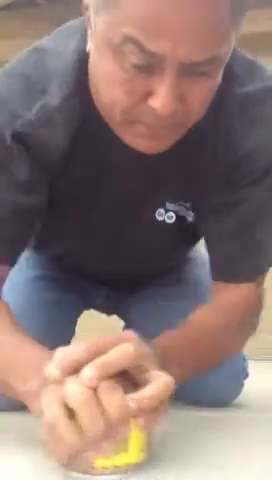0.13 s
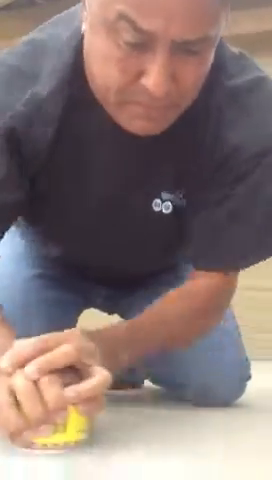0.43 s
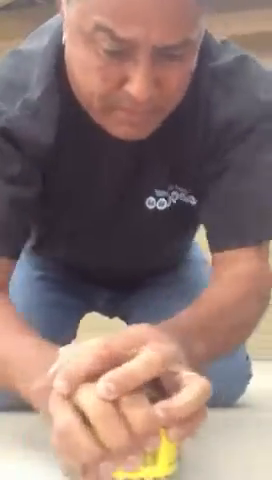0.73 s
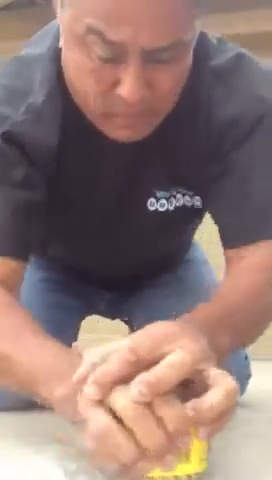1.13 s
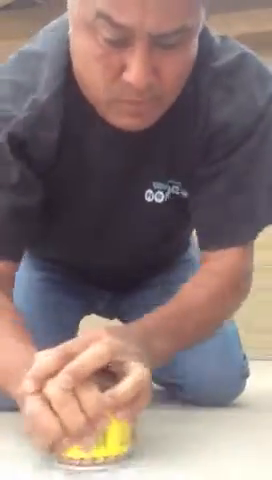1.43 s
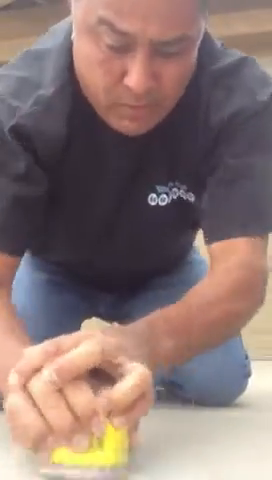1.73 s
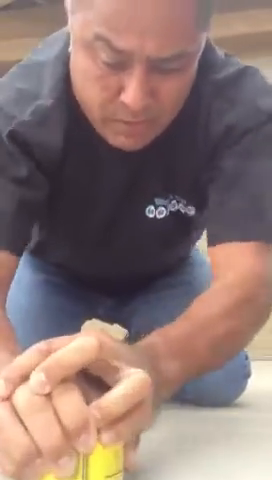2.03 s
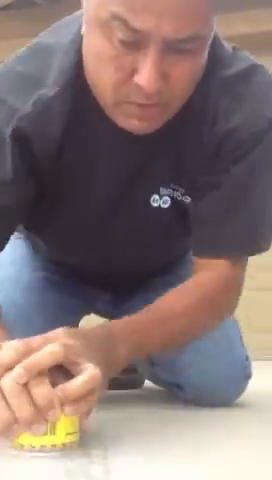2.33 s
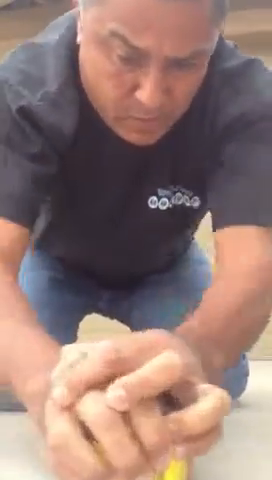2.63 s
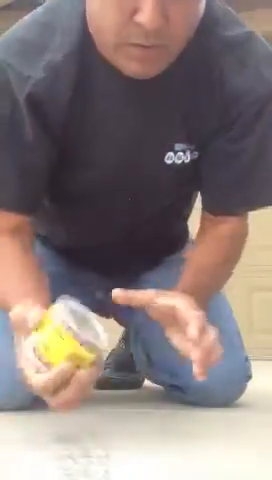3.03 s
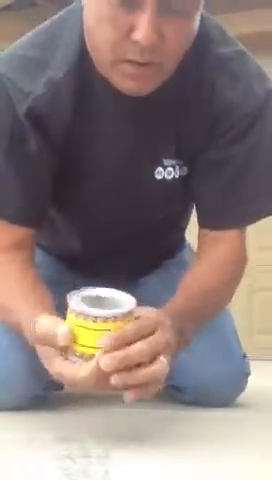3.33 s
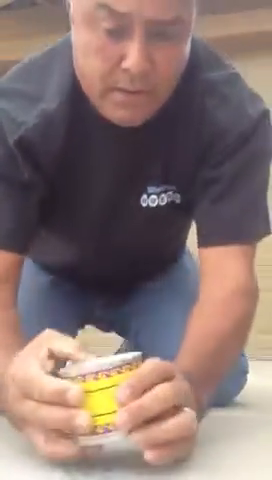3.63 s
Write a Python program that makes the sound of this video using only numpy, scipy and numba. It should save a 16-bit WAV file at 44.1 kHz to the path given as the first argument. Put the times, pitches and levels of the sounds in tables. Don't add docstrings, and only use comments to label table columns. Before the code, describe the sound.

A small metal can is scraped on rough concrete in about four short strokes a second, gritty and hollow, with a rattling skip midway, then near quiet; close phone microphone outdoors.

```python
import sys
import numpy as np
from scipy import signal
from scipy.fft import rfft, irfft
from scipy.io import wavfile
from scipy.ndimage import uniform_filter1d
from numba import njit

SR = 44100
rng = np.random.default_rng(int(sys.argv[2]) if len(sys.argv) > 2 else 0)


def ratio_of_db(decibels):
    return 10 ** (np.asarray(decibels, float) / 20)


def output_pcm(signal):
    pcm = np.clip(np.atleast_2d(signal).T, -1, 1) * 32767
    wavfile.write(sys.argv[1], SR, np.round(pcm).astype(np.int16))


N = 167580

# start in seconds, length in seconds, grit level in dB,
# place of top speed (0-1), ring level in dB.
STROKES = [(-.14, 0.19, -28.5, 0.17, 7.5), (0.062, 0.23, -23.5, 0.65, -9), (0.318, 0.22, -35, 0.41, 2),
           (0.536, 0.2, -26.5, 0.58, 0.5), (0.749, 0.22, -33.5, 0.53, 1), (0.976, 0.19, -27.5, 0.57, 1.5),
           (1.213, 0.21, -41.5, 0.39, 6), (1.442, .228, -33, 0.5, 1.5), (1.831, 0.069, -33.5, 0.8, 4),
           (1.919, .24, -34.5, 0.6, -0.5), (2.22, 0.27, -30, 0.05, 3), (2.462, 0.25, -30, 0.66, 2.5),
           (2.724, 0.27, -36.5, 0.51, 4)]
JUDDER_PER_S = 90
PITCH_WANDER = 0.016


def level(x, db):
    return x * ratio_of_db(db) / np.sqrt(np.mean(x ** 2))


@njit
def svf(x, hz, width_hz):
    y, band, low = np.empty(len(x)), 0., 0.
    for i in range(len(x)):
        g, damping = np.tan(np.pi * hz[i] / SR), width_hz / hz[i]
        v = (band + g * (x[i] - low)) / (1 + g * (g + damping))
        low += 2 * g * v
        band = 2 * v - band
        y[i] = damping * v
    return y


def ring(x, hz, width_hz):
    return svf(x + 1e-18, hz + np.zeros(N), 1. * width_hz) * np.sqrt(SR / np.pi / width_hz)


def mode(x, hz, width_hz):
    return ring(ring(x, hz, width_hz), hz, width_hz) * np.sqrt(2 * np.pi * width_hz / SR)


def colour(x, table):
    hz, db = np.array(table, float).T
    bin_hz = np.arange(N // 2 + 1) * SR / N
    return irfft(rfft(x) * ratio_of_db(np.interp(np.log(bin_hz + 1), np.log(hz), db)), N)


def walk(rate_per_s):
    hold = int(SR / rate_per_s)
    steps = np.repeat(rng.standard_normal(N // hold + 1), hold)
    return 1.55 * uniform_filter1d(uniform_filter1d(steps, hold), hold)[:N]


def bell(t, at, half_s):
    return np.exp(-((t - at) / half_s) ** 2)


def grit():
    grains_per_s, spread_db, cap_db = 16000, 2.5, 9
    chance, sign, size = rng.random((3, N))
    size_db = np.minimum(-spread_db * np.log(1 - size), cap_db)
    return level((chance < grains_per_s / SR) * np.sign(sign - .5) * ratio_of_db(size_db), 0)


def strokes(t):
    # time in seconds, half width in seconds, grit boost in dB, ring boost in dB.
    patches = [(0.11, 0.045, 4, 15.5), (0.18, 0.014, -6.5, 3), (0.22, 0.019, 7, -0.5),
               (0.28, 0.015, 12.5, -4), (0.47, 0.017, 2.5, 4.5), (0.686, 0.01, 3, -3),
               (1.073, 0.05, 1.5, 2), (1.283, .005, 2, 5), (1.538, 0.02, 0.5, -2.5),
               (2.01, 0.012, -1.5, 11), (2.55, 0.0056, -2.5, 3), (3.2, 0.0047, 0.5, 4.5), (3, 0.04, 1, 2.5),
               (3.3, 0.005, 5.5, 4.5), (2.80, 0.0068, 3, -1.5), (1.308, 0.0095, -0.5, 7.5),
               (0.66, 0.0068, 1.5, -2.5), (2.578, 0.0066, -1.5, -1), (1.5, .005, -3, -7.5),
               (0.25, 0.0034, 0, 5), (2.76, 0.0038, 6, 6), (2.5, 0.016, -1.5, 4), (1.945, .01, -8, 13),
               (2.5, 0.019, 1, 7.5), (2.44, 0.022, -0.5, 5)]
    bite_slope, speed_power = 2.8, 0.35
    force, push, turn, along = np.zeros(N), np.zeros(N), np.ones(N), np.zeros(N)
    for start, length, db, top, ring_db in STROKES:
        v = np.clip((t - start) / length, 0, 1)
        skew = np.log(.5) / np.log(np.clip(top, .1, .9))
        speed = np.sin(np.pi * v ** skew).clip(0)
        bite = np.tanh(bite_slope * speed) * speed ** speed_power
        force += ratio_of_db(db + 5.5) * bite
        push += ratio_of_db(db + 2.5 + ring_db) * bite
        turn -= speed
        along += (v - .5) * (v > 0) * (v < 1)
    for at, half_s, db, ring_db in patches:
        swell = bell(t, at, half_s)
        force *= ratio_of_db(db * swell)
        push *= ratio_of_db(ring_db * swell)
    force *= ratio_of_db(1.5 * walk(JUDDER_PER_S))
    push *= ratio_of_db(1.8 * walk(JUDDER_PER_S * 1.5))
    return force, push, turn, along


def hops(t):
    # time in seconds, grit level in dB, skid in seconds, thud level in dB, ring level in dB.
    landings = [(1.3283, -60, 0.0053, -28.5, -11), (1.3519, -24, 0.0015, -37, 6),
                (1.3744, -33, 0.009, -32, 6), (1.716, -30, 0.0056, -46.5, 2.5),
                (1.7231, -21.5, 0.011, -35, 1.5), (1.742, -33, .005, -38, 8), (1.7523, -9, 0.0036, -39, -4),
                (1.766, -36, 0.0042, -42, 9), (1.7799, -6, 0.0046, -36, -12),
                (1.795, -19, 0.0016, -54, 10.5), (1.8066, 0, 0.0058, -34, -17.5),
                (1.815, -32.5, 0.0038, -36, 2), (1.8408, -6.5, 0.0078, -24, -4),
                (1.851, -45, 0.0026, -31, -14), (1.8628, -24.5, 0.0091, -31, -3),
                (2.2103, -25.5, 0.0075, -41, -6), (2.226, -20.5, 0.021, -53, -3),
                (2.2525, -11.5, 0.0032, -38, -19), (2.283, -34.5, 0.01, -38.5, -6),
                (2.3124, -28.5, 0.012, -30.5, 8.5), (2.350, -31, 0.0016, -39, 8.5),
                (0.7779, -48, 0.015, -32.5, 14.5), (0.3355, -39.5, 0.0072, -37, -16),
                (1.2244, -39.5, 0.054, -40.5, -28), (0.0852, -34.5, 0.01, -42, -1),
                (0.541, -40, 0.0051, -47, -2), (1.936, -40, .012, -41, -0.5),
                (2.735, -40.5, 0.0056, -48, -0.5), (0.996, -43, 0.006, -49, 7)]
    airborne_s, airborne_db, landing_s = 0.007, -11, 0.0012
    skid, knock, thud, touch = np.zeros(N), np.zeros(N), np.zeros(N), np.ones(N)
    for at, db, skid_s, thud_db, ring_db in landings:
        attack = np.clip((t - at) / landing_s, 0, 1)
        slide = ratio_of_db(db) * attack * np.exp(-(np.clip(t - at, 0, 1) / skid_s) ** 1.16)
        skid += slide
        knock += ratio_of_db(ring_db + 2) * slide
        touch *= ratio_of_db(airborne_db * (t < at) * bell(t, at - airborne_s / 2, airborne_s))
        thud[int(at * SR)] += ratio_of_db(thud_db) * 12
    return skid, knock, touch, ring(thud, 336, width_hz=130)


def snags():
    # time in seconds, peak level in dB, lid share in dB.
    stones = [(0.112, -13, 3), (0.141, -10, -9), (0.164, -13, -1), (0.194, -19, 3), (0.215, -18, 0),
              (0.392, -19.5, -3), (0.412, -24, -6), (0.587, -22, 10), (0.637, -21, -3), (0.685, -18, 7),
              (0.793, -24, -2), (0.821, -17, 2), (0.854, -29, -6), (0.916, -16, -6), (1.029, -15, -8),
              (1.057, -18, -3), (1.094, -24, -24), (1.264, -22, -1), (1.284, -23, 6), (1.304, -23, 1),
              (1.351, -17.5, -9), (1.375, -21.5, 1), (1.397, -24, -5), (1.539, -25, -3), (2.007, -22, -1),
              (2.228, -12, -3), (2.252, -15.5, -3.5), (2.283, -19.5, -3), (2.312, -14.5, -4),
              (2.35, -16, 8), (2.385, -21.5, -1), (2.523, -31, 0), (2.549, -18, 0), (2.576, -18.5, -11),
              (2.595, -10.5, -12), (2.613, -17.5, -5), (2.666, -19, -5), (2.756, -30, -3),
              (2.797, -24, -0.5), (2.85, -29, -11), (2.875, -23, 4)]
    snag_db = 20.5
    blow, lid_blow = np.zeros(N), np.zeros(N)
    for at, db, lid_db in stones:
        i = int(at * SR)
        blow[i] = ratio_of_db(db + snag_db)
        lid_blow[i] = ratio_of_db(db + snag_db + lid_db)
    return blow, lid_blow


def grip(t):
    # wall in Hz, wall level in dB, lid in Hz, upper lid in Hz, upper lid level in dB.
    tunings = [(479, -10, 1015, 1405, 1.5), (461, -4.5, 1035, 1394, 1.5), (441, -9, 1014, 1384, 6),
               (543, -3, 1050, 1480, 0.5), (409, -8.5, 962, 1383, 2.5), (590, -1.5, 1070, 1450, -2),
               (471, -4.5, 997, 1420, -2), (776, 0, 1050, 1470, -1), (394, -9, 1043, 1290, 4.5),
               (503, -5, 926, 1450, -5), (361.4, -12, 853, 1350, 3), (521, -17.5, 983, 1435, 4),
               (392, -8, 940, 1300, 3)]
    # lid level in dB, wall climb along the stroke (share of Hz), rim in Hz,
    # rim level in dB, middle hiss level in dB.
    tilts = [(-0.5, 0.25, 2910, -12.5, -1), (-1.5, 0.4, 2900, -12, 1), (-1.5, 0.18, 2920, -14, 0),
             (0, .45, 2880, -9.5, -1.5), (-1, 0.31, 2900, -9.5, -2), (1, 0.41, 2850, -13.5, -8.5),
             (-0.5, -0.38, 2520, -13.5, 0.5), (-1.5, .08, 2400, -9.5, 0), (-5, .2, 2790, -25, -1.5),
             (-1, .15, 2970, -16, -0.5), (-5.5, 0.17, 2800, -32, -1.5), (1, 0.28, 2950, -6.5, 1.5),
             (-2, 0.36, 2700, -11.5, -1)]
    early_s = .12 * (np.abs(t - 1.77) < .07)
    which = (np.searchsorted(np.array(STROKES)[:, 0], t + early_s) - 1).clip(0)
    return (*np.array(tunings, float)[which].T, *np.array(tilts, float)[which].T)


def rim_hiss(scrape, shake, middle_db):
    # frequency in Hz, level in dB per Hz.
    slab = [(150, -19), (500, 1.5), (2400, -3), (3800, -22), (6000, -7.5), (9500, -0.5), (13300, 8),
            (14600, -6.5)]
    # frequency in Hz, width in Hz, level in dB.
    shell = [(211, 52, -23), (837, 190, -14), (1400, 670, -7.5), (1940, 330, -19), (2935, 480, -17.5),
             (4465, 1400, -12), (7280, 1900, -15), (10860, 980, -6), (11920, 2000, -2), (13690, 2300, -7)]
    hiss = ratio_of_db(-7.5) * colour(scrape, slab)
    for k, (hz, width_hz, db) in enumerate(shell):
        patchy = ratio_of_db(db - 5.5 + 2.5 * walk(15))
        source = scrape if hz > 2000 else shake
        hiss += (-1) ** k * patchy * ring(source, hz * (1 + .015 * walk(7.23)), width_hz)
    return hiss + (ratio_of_db(middle_db) - 1) * svf(hiss, 6000 + np.zeros(N), 6050.0)


def can(t):
    force, push, turn, along = strokes(t)
    skid, knock, touch, thud = hops(t)
    blow, lid_blow = snags()
    wall, wall_db, lid, upper, upper_db, lid_db, climb, rim, rim_db, middle_db = grip(t)

    def shaken(hit):
        return grit() * (push * ratio_of_db(1.5 * walk(JUDDER_PER_S / 2)) + knock) * touch + hit

    scrape = grit() * (force + skid) * touch + ratio_of_db(-21.5) * blow
    shake = shaken(ratio_of_db(-8.5) * blow)
    hiss = rim_hiss(scrape, shake, middle_db)

    lid_climb = .1 * along
    end_bend = .04 * turn * (along > 0)
    wall_hz = wall * (1 + .32 * turn ** 2 + climb * along + PITCH_WANDER * walk(30))
    lid_hz = lid * (1 + .03 * turn + PITCH_WANDER / 2 * walk(24.94))
    upper_hz = upper * (1 + lid_climb + end_bend + PITCH_WANDER * walk(35))
    rim_hz = rim * (1 + lid_climb + 2 * PITCH_WANDER * walk(40))
    body = mode(shaken(blow) * ratio_of_db(wall_db), wall_hz, 115)
    body += mode(shaken(lid_blow) * ratio_of_db(lid_db), lid_hz, 80)
    body += mode(shaken(blow) * ratio_of_db(upper_db), upper_hz, 240)
    body += mode(shaken(ratio_of_db(-10) * blow) * ratio_of_db(rim_db), rim_hz, 570)
    free_lid = ratio_of_db(-30) * ring(shake, 1450, width_hz=14)
    return hiss + ratio_of_db(-10) * body + thud + free_lid


def finger(t):
    # time in seconds, half width in seconds, level in dB.
    brushes = [
        (3.191, 0.022, -76.5),
        (3.265, 0.043, -62.5),
        (3.471, .05, -80),
        (3.601, 0.037, -81),
        (3.79, 0.04, -80.5),
    ]
    # frequency in Hz, width in Hz, level in dB.
    free_can = [(900, 150, -14), (1720, 4, -5), (3100, 300, -15), (4800, 170, -8), (6300, 400, -11),
                (9500, 500, -8), (11000, 1200, 0)]
    rub = grit() * sum(ratio_of_db(db) * bell(t, at, half_s) for at, half_s, db in brushes)
    glide = .9 * np.clip(t - 3.26, -.1, .1)
    out = ratio_of_db(-4) * rub
    for hz, width_hz, db in free_can:
        out += ratio_of_db(db) * ring(rub, hz * (1 + (hz > 2000) * glide), width_hz)
    return out


def soft_bumps(t):
    # time in seconds, frequency in Hz, level in dB, half width in seconds.
    bumps = [
        (0.488, 205, -34, 0.011),
        (3.115, 300, -53.5, 0.02),
        (3.147, 283, -45.5, 0.0044),
        (3.244, 218, -59, .01),
    ]
    return sum(ratio_of_db(db) * bell(t, at, half_s) * np.sin(2 * np.pi * hz * t) for at, hz, db, half_s in bumps)


def yard():
    # frequency in Hz, level in dB per Hz.
    spectrum = [(30, -54), (130, -7), (230, -5.5), (450, -15), (800, -25), (1500, -29.5), (5000, -36.5),
                (15000, -33.5)]
    far = colour(rng.standard_normal(N), spectrum)
    low = ring(far, 251, width_hz=500)
    return level(far + .02 * low * (ratio_of_db(2.5 * walk(2.2)) - 1), -59)


def scene():
    t = np.arange(N) / SR
    near = can(t) + finger(t) + soft_bumps(t)
    echo_db, echo_t60_s, echo_n = -14.5, 0.16, SR // 4
    decay = ratio_of_db(-60 * t[:echo_n] / echo_t60_s)
    tail = level(rng.standard_normal(echo_n) * decay, echo_db) / np.sqrt(echo_n)
    return (near + signal.fftconvolve(near, tail)[:N] + yard())[None]


def top_cut(x):
    return signal.sosfilt(signal.butter(12, 16500, fs=SR, output="sos"), x)


def record(dry):
    x = signal.sosfilt(signal.butter(2, 90, "high", fs=SR, output="sos"), dry)
    top_hz, top_db, end_hz = 15300, -40, 16600
    hz = np.arange(N // 2 + 1) * SR / N
    gain = np.where(hz < top_hz, 1, ratio_of_db(top_db) * (hz < end_hz))
    return top_cut(irfft(rfft(x) * gain, N))


dry = scene()
out = record(dry)
output_pcm(out)
```